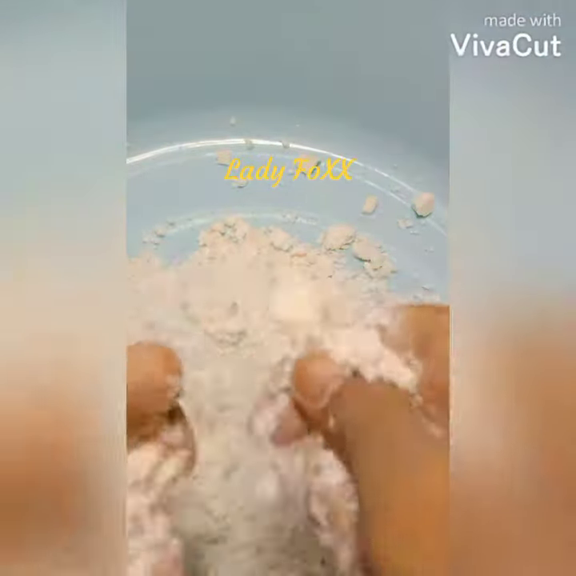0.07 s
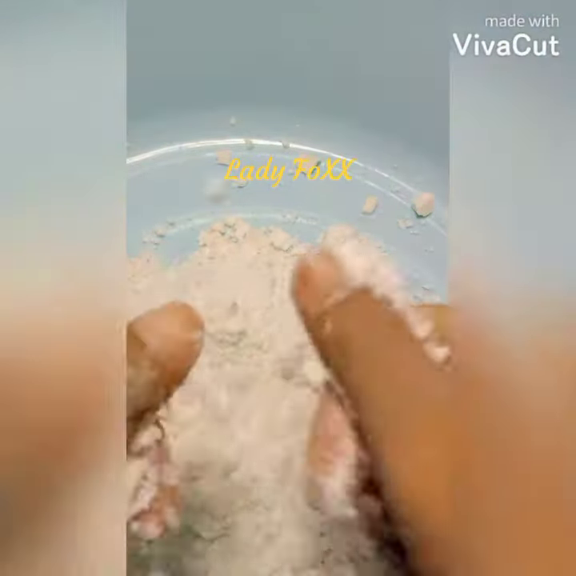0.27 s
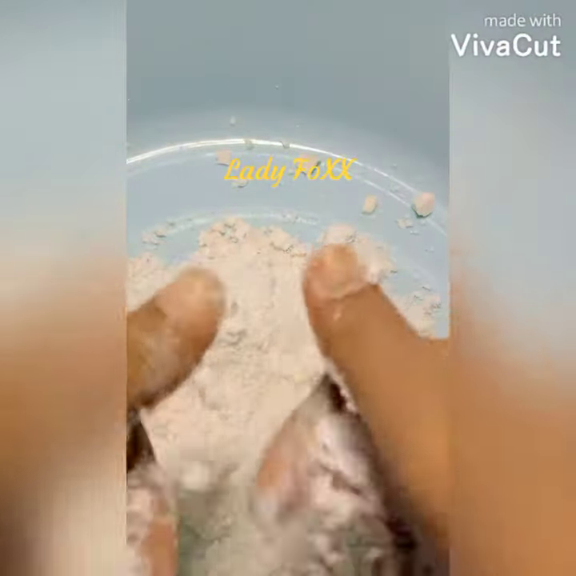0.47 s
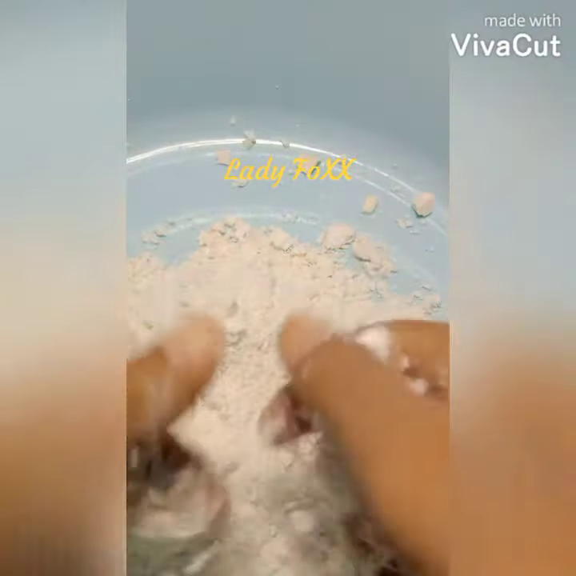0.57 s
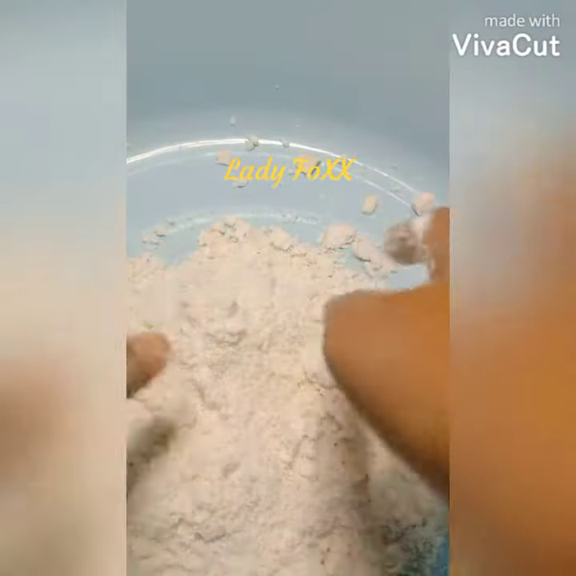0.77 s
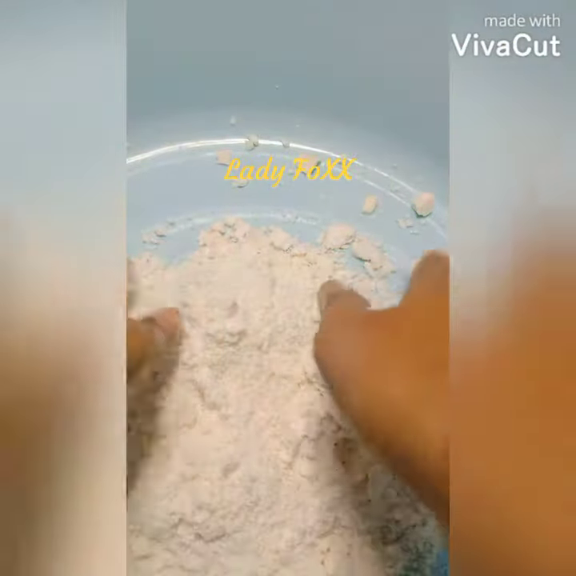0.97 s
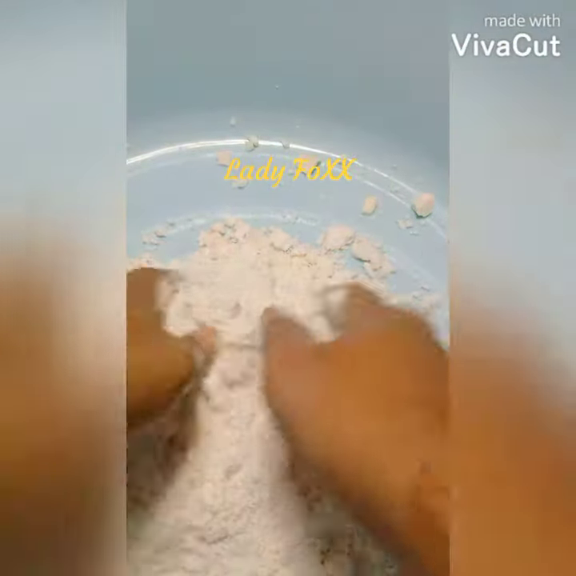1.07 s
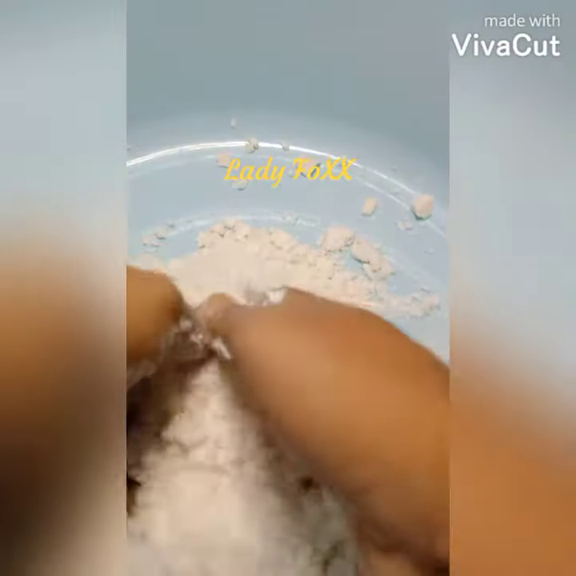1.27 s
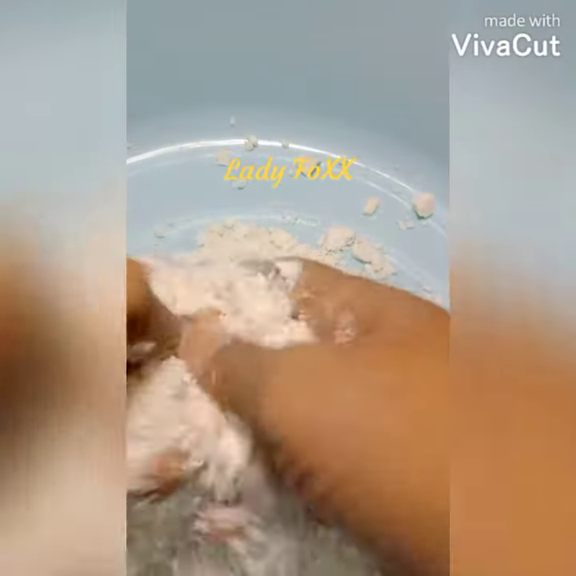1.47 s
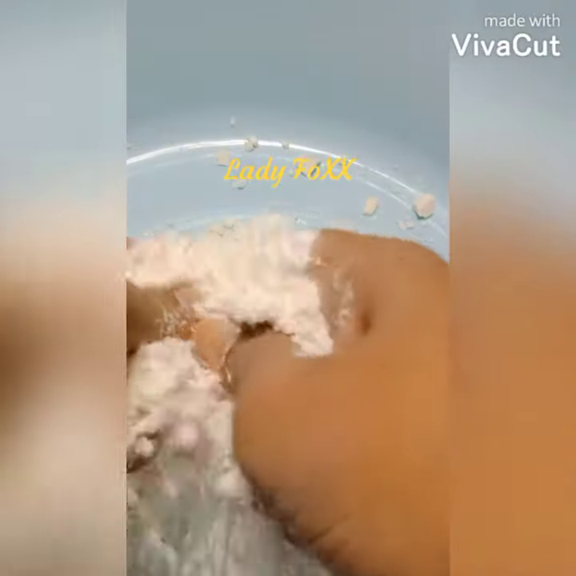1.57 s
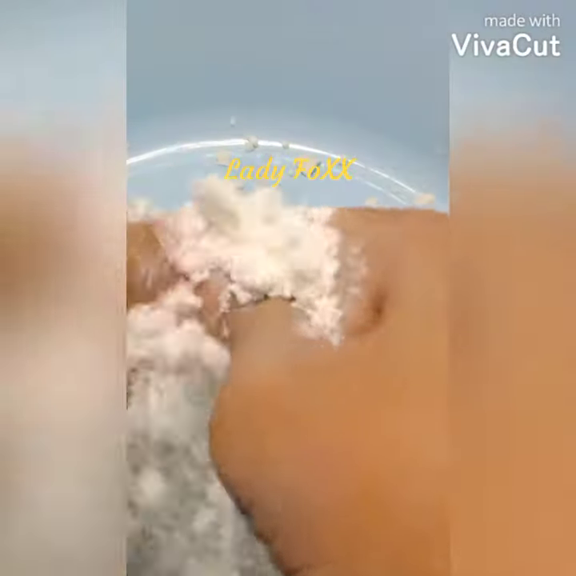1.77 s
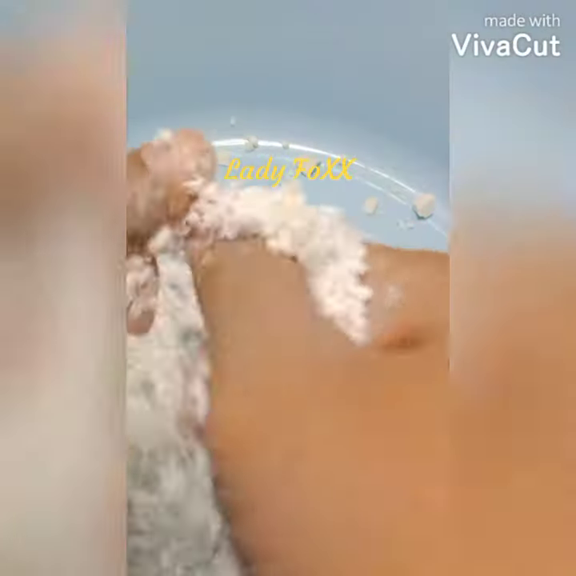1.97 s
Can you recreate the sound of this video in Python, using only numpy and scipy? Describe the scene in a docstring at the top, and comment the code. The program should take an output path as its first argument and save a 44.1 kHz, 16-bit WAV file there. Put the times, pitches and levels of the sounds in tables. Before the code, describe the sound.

Dry cornstarch crumbles between two hands, close by over a plastic basin. Sharp snaps and dull knocks of dropping lumps come first, loudest around 0.2 seconds. From 0.5 to 0.8 seconds, powder slides off the fingers with a soft hiss. From about 1 to 2 seconds, the hands squeeze again with scattered crackles and low bumps, and sharper snaps near 1.45 and 1.9 seconds, over faint steady room noise.

```python
"""Sharp snaps and dull knocks come first: two hands crumble dry cornstarch over a plastic basin,
close by, and the lumps break and drop. A handful of powder slides off the fingers with a hiss, then
the hands dig in and squeeze again. Each snap or knock is one short pulse; the powder is many tiny
slips. These sounds bounce around the basin and die away in a small room, over a faint steady noise."""
import sys
import numpy as np
from scipy import signal
from scipy.io import wavfile

SR = 44100
rng = np.random.default_rng(int(sys.argv[2]) if len(sys.argv) > 2 else 0)


def dump(signal):
    """Clip the signal to [-1, 1] and save it as 16-bit WAV at the path in sys.argv[1]."""
    limited = np.clip(np.atleast_2d(signal).T, -1, 1)
    pcm = np.round(limited * 32767).astype(np.int16)
    wavfile.write(sys.argv[1], SR, pcm)


N = 88200

# how long the room takes to fade by 60 dB (frequency [Hz], time [s])
ROOM_FADE_TIMES = [(150, 0.25), (700, 0.059), (2500, .15), (8000, 0.095)]
# echoes inside the basin (delay [ms], gain [ratio])
BASIN_ECHOES = [(2.15, -0.3), (2.8, 0.42), (5.5, 0.1), (8.4, 0.1)]
# pitches at which the basin rings (frequency [Hz], width [Hz], gain [ratio])
BASIN_PITCHES = [(381.5, 34, 0.59), (682, 46, 0.65), (1082, 55, 0.35), (1430, 75, 0.58), (1885, 23, 0.44)]

# when the powder moves, and how strongly (start [s], length [s], level [dB])
SIFT_MOVES = [(0, 0.078, -53.5), (.078, 0.016, -49.5), (.125, 0.019, -57), (.188, 0.044, -53),
              (.27, 0.076, -63), (.335, 0.16, -58.5), (.458, 0.0045, -48.5), (1.02, 0.02, -60.5),
              (1.222, 0.077, -59.5), (1.28, 0.1, -66), (1.335, 0.071, -59), (1.443, 0.038, -48),
              (1.48, 0.071, -58.5), (1.565, 0.076, -61.5), (1.728, 0.068, -62), (1.8, 0.27, -68.5),
              (1.962, 0.046, -54.5)]  # fine powder sifting between the fingers
PATTER_MOVES = [(0, 0.035, -52), (.06, 0.046, -58.5), (.12, 0.12, -55), (.26, 0.074, -57),
                (.83, 0.088, -69.5), (.953, 0.0072, -66), (1.02, 0.029, -64), (1.228, 0.037, -57.5),
                (1.448, 0.0069, -72), (1.47, 0.05, -65), (1.67, 0.026, -65.5), (1.78, 0.012, -67),
                (1.842, 0.0051, -60.5), (1.936, 0.086, -66.5)]  # crumbs pattering down
CRUNCH_MOVES = [(0, 0.023, -48), (.22, .06, -59), (.73, 0.032, -44.5), (.768, 0.017, -41.5),
                (.81, 0.12, -68), (1.23, 0.018, -51), (1.54, 0.026, -66), (1.62, 0.0082, -60.5),
                (1.715, 0.072, -62.5), (1.83, 0.092, -67)]  # packed starch crunching under the fingers
PUSH_MOVES = [(.08, 0.088, -49.5), (.19, 0.046, -48), (.29, 0.043, -62), (.478, 0.065, -54),
              (.53, 0.089, -52), (.725, 0.061, -54.5), (1.235, 0.065, -62.5), (1.335, 0.094, -64.5),
              (1.475, 0.12, -53), (1.62, 0.025, -49), (1.67, 0.022, -54), (1.72, 0.11, -52.5),
              (1.85, 0.042, -61)]  # hands pushing on the basin

# lumps and fingers landing on the powder (time [s], level [dB], low edge [Hz], high edge [Hz])
LANDINGS = [(.0035, -32.5, 430, 960), (.0890, -30, 242, 890), (0.1269, -31, 172, 560),
            (.1340, -33, 400, 1000), (.1458, -19.5, 495, 996), (0.1828, -27, 450, 1100),
            (0.1897, -14.5, 375, 930), (.1952, -20, 454, 890), (.2008, -9, 407, 950),
            (.2030, -22.5, 151.5, 380), (0.2191, -23, 442, 1240), (.2272, -17.5, 420, 1110),
            (.2375, -63, 392, 1100), (.2555, -33.5, 460, 1050), (0.5206, -31.5, 150, 550),
            (0.5302, -24, 124, 445), (0.606, -49, 119, 420), (0.8332, -35, 272, 910),
            (0.879, -44.5, 900, 1234), (1.016, -39, 335, 550), (1.0197, -37.5, 800, 1430),
            (1.103, -60, 290, 396), (1.1934, -49, 600, 1400), (1.2165, -38.5, 500, 1300),
            (1.2196, -33.5, 475, 1220), (1.396, -60, 86, 135.4), (1.448, -47, 1060, 1520),
            (1.4515, -36, 1134, 1540), (1.496, -66, 69, 125), (1.537, -54, 70.5, 133),
            (1.626, -55, 80, 258), (1.717, -46.5, 150, 485), (1.7885, -37.5, 203, 430),
            (1.9355, -37, 634, 1120)]
# lumps breaking (time [s], level [dB], low edge [Hz], high edge [Hz], splinters against the snap [dB])
BREAKS = [(0.0193, -40.5, 690, 2900, -14), (0.0625, -22, 705, 7300, -5), (0.125, -34, 1490, 4370, -14.5),
          (0.1625, -33, 900, 5840, -14), (.2017, -29.5, 1280, 3060, -11), (0.2431, -19, 1010, 6600, -16),
          (.306, -47.5, 890, 4950, -4), (0.3214, -37, 843, 2180, -9), (0.5221, -31, 443, 3600, -6.5),
          (.8345, -43, 890, 2040, -13), (.903, -53, 667, 2600, -12), (1.0156, -31, 750, 1860, -7.5),
          (1.037, -47, 900, 2300, -8), (1.225, -28.5, 1264, 6940, -10.5), (1.37, -38.5, 4650, 8600, 0),
          (1.4509, -24, 2380, 8800, -11), (1.4548, -26, 6370, 7840, -11), (1.503, -39.5, 2400, 7500, -33),
          (1.5388, -44.5, 2490, 7540, -9.5), (1.632, -54.5, 2700, 3360, -4),
          (1.7335, -32.5, 5300, 9100, -20), (1.779, -42.5, 825, 1960, -6.5),
          (1.839, -52.5, 1080, 2950, -5.5), (1.934, -21.5, 694, 3380, -35), (1.956, -37.5, 2220, 7100, -12),
          (1.9925, -45, 895, 3040, -6)]

# the tone of each sound, from bass to treble (frequency [Hz], level [dB])
BACKGROUND_TONE = [(20, -17), (70, 2), (350, 0.5), (700, -17.5), (1500, -12), (4000, -19), (6000, -14),
                   (6800, -2.5), (8300, -13.5), (10000, -26), (12000, -22.5)]
SLIDING_TONE = [(40, -26), (120, 4.5), (350, 1), (1100, -2.5), (1900, -6), (3500, -8.5), (5500, -5.5),
                (7000, 0.5), (8200, -7), (9800, -15), (11200, -22), (12000, -27.5)]
SIFTING_TONE = [(1500, -11), (3000, -18), (4500, -6.5), (6000, -2), (6900, 6), (8000, -3), (9800, -11.5),
                (11200, -14.5), (12000, -68)]
PATTERING_TONE = [(300, -14), (700, 1.5), (1100, 2), (1700, -6), (2800, -6.5), (4500, -11.5), (7000, -18),
                  (10000, -38)]
CRUNCHING_TONE = [(100, -23.5), (250, -2), (400, 1.5), (520, -3.5), (700, -13.5), (1000, -11.5),
                  (2000, -43), (6000, -73.5)]
PUSHING_TONE = [(20, -23), (45, -14), (75, 2), (110, 2.5), (170, -5.5), (350, -24.5), (800, -52.5)]
LANDING_TONE = [(30, -20.5), (150, 3), (1200, -3.5), (2200, -6.5), (5000, -16), (11000, -17)]
BREAKING_TONE = [(500, 0.5), (4000, -1), (7200, 1), (9500, -2.5), (12000, -7)]


def amp(db):
    """Turns decibels into a number to multiply by."""
    return 10 ** (np.asarray(db) / 20)


def unit(sound):
    """Scales a sound to an average power of 1."""
    return sound / np.sqrt(np.mean(sound ** 2) + 1e-20)


def look_up(table, hz):
    """Reads between the rows of a table, with frequency spaced in octaves."""
    row_hz, values = np.transpose(table)
    return np.interp(np.log(hz + 1), np.log(row_hz + 1), values)


def add(mix, start_s, sound):
    """Adds a sound to the mix at the given time."""
    part = mix[max(round(start_s * SR), 0):][:len(sound)]
    part += sound[:len(part)]


def colour(sound, tone):
    """Gives a sound its tone. The filter never sounds early, so clicks keep their sharp start."""
    hz = abs(np.fft.fftfreq(4096, 1 / SR))
    log_gain = np.log(amp(look_up(tone, hz)))
    response = np.fft.ifft(np.exp(np.conj(signal.hilbert(log_gain)))).real
    return signal.fftconvolve(sound, response[:len(response) // 2])[:len(sound)]


def background():
    """A faint, steady rumble and hiss."""
    return amp(-66) * unit(colour(rng.standard_normal(N), BACKGROUND_TONE))


def room(sound, level_db=-14.5, build_up_s=0.0035):
    """The small room adds a short wash of echoes; each frequency fades at its own speed."""
    hz, t, spectrum = signal.stft(rng.standard_normal(SR // 2), SR, nperseg=256)
    fade = np.exp(-np.log(1000) * t / look_up(ROOM_FADE_TIMES, hz)[:, None])
    tail = signal.istft(spectrum * fade, SR)[1]
    tail *= np.minimum(np.arange(len(tail)) / SR / build_up_s, 1) ** 2
    return amp(level_db) * signal.fftconvolve(sound, tail / np.linalg.norm(tail))[:N]


def basin_bounces(sound, dull_above_hz=3600):
    """Quick echoes make the basin sound hollow. They are dull because the powder soaks up treble."""
    t = np.arange(SR // 20) / SR
    response = signal.unit_impulse(len(t))
    for delay_ms, gain in BASIN_ECHOES:
        bounce = np.exp(-(np.pi * dull_above_hz * (t - delay_ms / 1000)) ** 2)
        response += gain * bounce / bounce.sum()
    return signal.fftconvolve(sound, response)[:N]


def basin_ring(sound):
    """The plastic basin rings briefly at its own pitches."""
    return sound + sum(gain * signal.lfilter(*signal.iirpeak(hz, hz / width_hz, fs=SR), sound)
                       for hz, width_hz, gain in BASIN_PITCHES)


def grains(tone, per_s, spread_db, dust, clump_db, clump_s):
    """Tiny random slips plus a smooth hiss of dust, swelling and dipping together in clumps."""
    sizes = amp(spread_db * np.minimum(rng.exponential(1, N), 4))
    signs = rng.choice([-1., 1.], N)
    slipping = rng.random(N) < per_s / SR
    slips = unit(signs * sizes * slipping)
    swells = rng.uniform(-1, 1, N // 10)  # one value every clump_s seconds
    clumps = amp(clump_db * np.interp(np.arange(N) / SR / clump_s, np.arange(len(swells)), swells))
    return unit(colour((slips + dust * rng.standard_normal(N)) * clumps, tone))


def strokes(moves, rise_s=0.0065, fade_s=0.013):
    """The strength of short hand movements over time: each rises, holds and fades."""
    t, power = np.arange(N) / SR, np.zeros(N)
    for start_s, length_s, db in moves:
        rise = np.clip((t - start_s) / rise_s, 0, 1)
        fade = np.exp(-np.maximum(t - start_s - length_s, 0) / fade_s)
        power += (amp(db) * rise * fade) ** 2
    return np.sqrt(power)


def slide(start_s=0.476, rise_s=0.02, end_s=0.787, fade_s=0.036, level_db=-43, drop_db_per_s=16.5):
    """The strength of a handful sliding off the hand: it starts quickly, thins out and stops."""
    t = np.arange(N) / SR
    rise = np.clip((t - start_s) / rise_s, 0, 1)
    fade = np.exp(-np.maximum(t - end_s, 0) / fade_s)
    return rise * fade * amp(level_db - drop_db_per_s * (t - start_s))


def powder():
    """The hands move the powder: five streams of grains, from a fine hiss to a coarse rumble."""
    sliding = grains(SLIDING_TONE, per_s=5600, spread_db=4.5, dust=0.49, clump_db=-0.5, clump_s=0.0048)
    sifting = grains(SIFTING_TONE, per_s=2000, spread_db=0, dust=1, clump_db=6.5, clump_s=0.0055)
    pattering = grains(PATTERING_TONE, per_s=650, spread_db=-0.5, dust=1, clump_db=6.5, clump_s=0.005)
    crunching = grains(CRUNCHING_TONE, per_s=500, spread_db=4, dust=0.4, clump_db=3, clump_s=0.008)
    pushing = grains(PUSHING_TONE, per_s=260, spread_db=2.5, dust=0.88, clump_db=1.5, clump_s=0.06)
    return (slide() * sliding
            + strokes(SIFT_MOVES) * sifting
            + strokes(PATTER_MOVES) * pattering
            + strokes(CRUNCH_MOVES) * crunching
            + strokes(PUSH_MOVES) * pushing)


def pulse(low_hz, high_hz, order):
    """One short tap of height 1, filling the range between two frequencies."""
    edges_hz = np.clip([low_hz, max(high_hz, low_hz * 1.1)], 20, SR / 2 - 1)
    band = signal.butter(order, edges_hz, "band", fs=SR, output="sos")
    tap = signal.sosfilt(band, signal.unit_impulse(SR // 20))
    return tap / abs(tap).max()


def knocks():
    """Soft lumps and fingers land on the powder with one dull pulse each."""
    mix = np.zeros(N)
    for time_s, db, low_hz, high_hz in LANDINGS:
        add(mix, time_s, -amp(db) * pulse(low_hz, high_hz, order=2))
    return colour(mix, LANDING_TONE)


def snaps(splinter_fade_s=0.003):
    """A lump breaks with one sharp pulse, followed by a short spray of tiny cracks."""
    mix, t = np.zeros(N), np.arange(SR // 20) / SR
    for time_s, db, low_hz, high_hz, splinter_db in BREAKS:
        splinters = rng.standard_normal(len(t)) * rng.random(len(t)) ** 2
        force = amp(splinter_db) * splinters * np.exp(-t / splinter_fade_s)
        force[0] = 1  # the main break
        add(mix, time_s, -amp(db) * signal.fftconvolve(force, pulse(low_hz, high_hz, order=3)))
    return colour(mix, BREAKING_TONE)


def scene():
    """The starch sounds pass through the basin and the room, over the background."""
    starch = knocks() + snaps() + powder()
    in_basin = basin_ring(basin_bounces(starch))
    return (in_basin + room(in_basin) + background())[None]


def record(dry):
    """The microphone loses the deepest bass, and the highest treble is cut off."""
    low_cut_hz, high_cut_hz = 64, 11600
    bass_cut = signal.butter(2, low_cut_hz, "high", fs=SR, output="sos")
    treble_cut = signal.firwin(201, high_cut_hz, window=("kaiser", 8), fs=SR)
    return signal.oaconvolve(signal.sosfilt(bass_cut, dry), treble_cut[None], "same")


dry = scene()
out = record(dry)
dump(out)
```